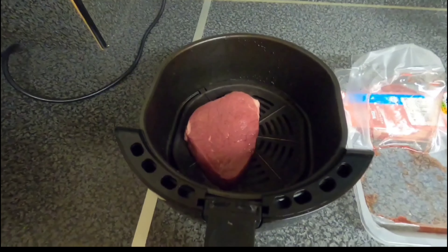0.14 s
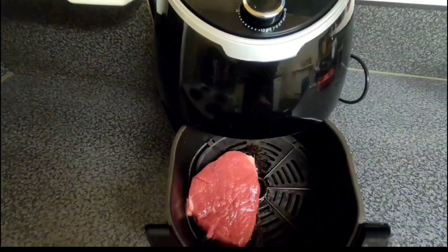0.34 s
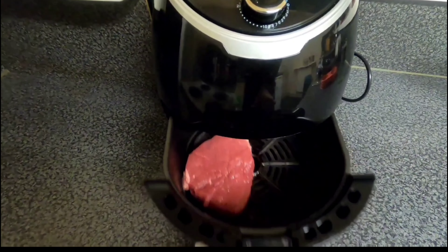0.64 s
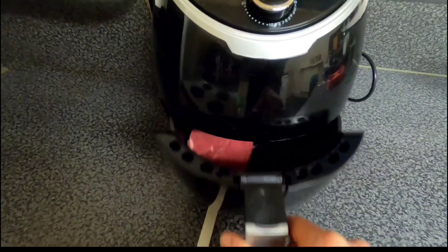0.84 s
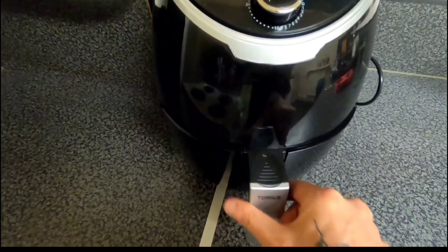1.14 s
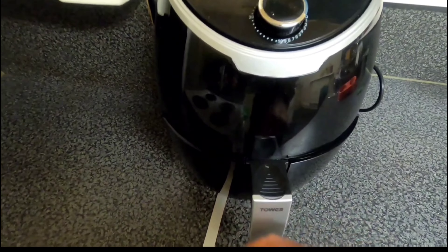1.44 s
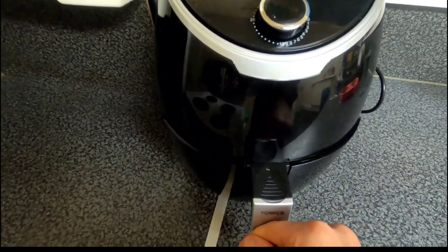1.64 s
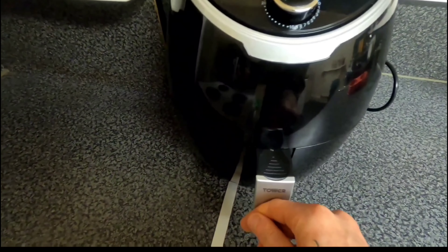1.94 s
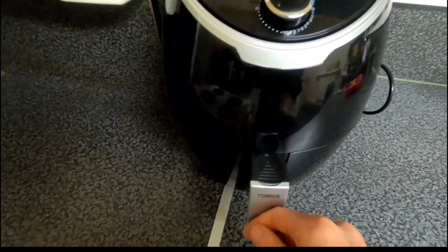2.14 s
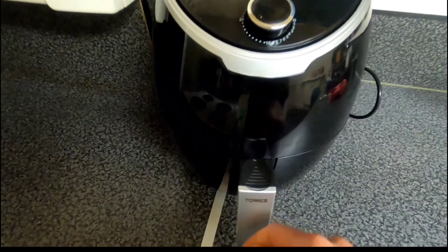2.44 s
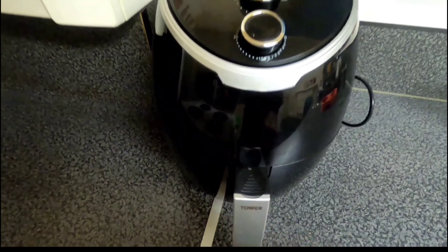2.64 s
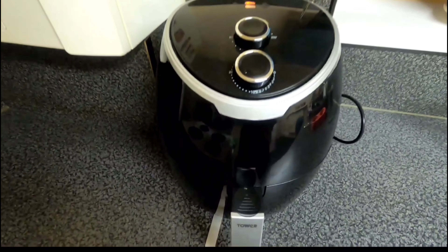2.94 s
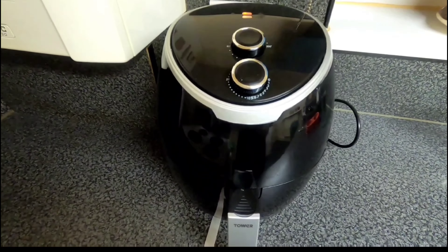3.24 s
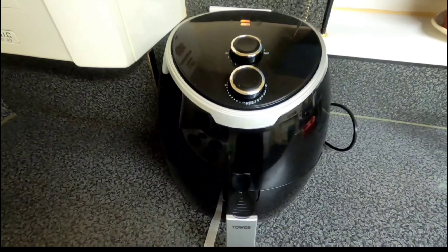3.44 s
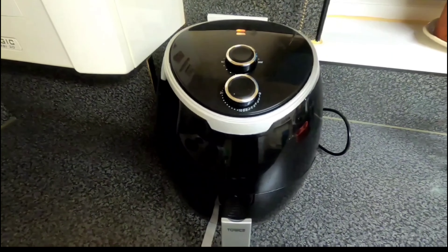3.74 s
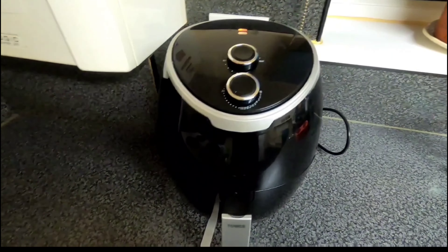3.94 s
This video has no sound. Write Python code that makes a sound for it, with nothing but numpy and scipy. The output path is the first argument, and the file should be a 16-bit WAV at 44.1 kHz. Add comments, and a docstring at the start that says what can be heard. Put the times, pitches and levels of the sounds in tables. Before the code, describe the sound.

An air fryer basket is pushed along its guides, scraping and knocking, with rattling plastic, a briefly ringing steel pan and dull thumps on the worktop. After a short lull the latch snaps shut, the loudest sound. The fan then spins up with a low hum and a growing rush of air, while a clockwork timer ticks faintly. The microphone is hand-held and close, in a hard-walled kitchen.

```python
"""Air fryer, latched and started

A hand-held microphone, close to the fryer in a hard-walled kitchen. The basket is lifted and rubs
along its guides; its knocks rattle the plastic shell and ring the steel pan, and its weight thumps
housing and worktop. It is pressed home until the latch snaps. The fan then spins up with a hum,
a duct drone and a rush of air, while the clockwork timer ticks."""
import sys
import numpy as np
from scipy import signal
from scipy.fft import rfft, irfft
from scipy.io import wavfile
from scipy.ndimage import uniform_filter1d, minimum_filter1d

SR = 44100
rng = np.random.default_rng(int(sys.argv[2]) if len(sys.argv) > 2 else 0)


def file_out(sig):
    """Save sig as 16-bit WAV at sys.argv[1]."""
    # one column per channel
    cols = np.atleast_2d(sig).T
    # limit, then scale
    lim = np.clip(cols, -1, 1)
    pcm = np.round(lim * 32767).astype(np.int16)
    wavfile.write(sys.argv[1], SR, pcm)


N = 180226
TIME = np.arange(N) / SR
RING_TIME = TIME[:SR]
SEATED_S, LATCH_S, FAN_START_S = 1.25, 2.0487, 2.453
DIP_START_S, DIP_END_S = 0.416, 0.488

# How alike the microphone's two sides are. Each row: frequency in Hz, correlation.
STEREO_LIKENESS = [(250, 0.94), (1300, 0.88), (2900, 0.75), (6000, 0.058)]
# Kitchen room tone. Each row: frequency in Hz, relative density in dB.
ROOM_SPECTRUM = [(20, 13), (60, 6), (140, 14), (215, 6.5), (330, -1.5), (700, -9), (1900, -14), (2500, -19),
                 (5000, -23.5), (9500, -31), (12000, -56.5)]
# Pushes along the guides. Each row: start in seconds, length in seconds, level in dB.
GUIDE_PUSHES = [(0.003, 0.066, -63.5), (0.48, 0.2, -74.5), (0.691, 0.0071, -55), (0.783, 0.5, -48)]
# Friction on the guides. Each row: frequency in Hz, relative density in dB.
RUB_SPECTRUM = [(150, -9), (600, 1.5), (850, -7), (1150, 0.5), (2000, -8), (4200, -13), (7000, -15.5),
                (11000, -25), (13500, -53)]
# The hollow basket's resonances. Each row: frequency in Hz, width in Hz, gain in dB.
HOLLOW_PEAKS = [(279, 83, 4), (564, 190, 0.5), (1050, 70, 1.5), (1600, 55, -5), (2130, 36, -15.5),
                (2820, 350, -12.5), (4200, 200, -15.5)]
# The hand jostles the basket. Each row: time in seconds, level in dB.
HAND_NUDGES = [(0.021, -35), (0.25, -36), (0.52, -39.5), (0.78, -33), (1.219, -35), (1.53, -44),
               (1.996, -41.5), (2.09, -44.5)]
# Handling rumble. Each row: frequency in Hz, relative density in dB.
JOSTLE_SPECTRUM = [(20, -10.5), (45, -5), (68, 9), (105, -7), (150, -2.5), (250, -13.5), (400, -25),
                   (900, -64.5)]
# Rubbing squeaks. Each row: time and half-length in seconds, pitch and width in Hz, level in dB.
RUB_SQUEAKS = [(0.06, 0.012, 4020, 630, -60), (0.698, 0.0072, 4450, 160, -59.5),
               (0.697, 0.0072, 1248, 406, -51), (1.055, 0.032, 4110, 234, -51),
               (1.062, 0.014, 1050, 150, -41), (1.086, 0.008, 602, 420, -28),
               (1.211, 0.0096, 2170, 118.7, -57)]
# Fingers on the handle. Each row: time in seconds, level in dB.
FINGER_SCUFFS = [(0.233, -58), (0.295, -53.5), (0.322, -65), (0.368, -58), (0.511, -50.5), (0.621, -56.5)]
# The handle is gripped or let go. Each row: start in seconds, level in dB, pitch in Hz, T60 in seconds.
FLEXES = [(1.351, -4.5, 237.5, 0.08), (1.519, -20.5, 216.6, 0.16), (1.822, -27, 238, 0.15)]
# The escapement unlocks, drops onto a tooth and rebounds.
# Each row: tick delay in seconds, tick level in dB, tock delay in seconds, tock level in dB.
BEAT_CONTACTS = [(-0.04, -17, -0.014, -10), (0, 0.5, 0, 0), (0.007, -2, 0.011, -7.5)]
# Resonances of the timer works. Each row: frequency in Hz, width in Hz, gain in dB.
WORKS_PEAKS = [(1380, 360, -5.5), (3030, 93, 1), (3890, 730, -8), (5270, 420, -0.5), (8620, 4600, -18)]
# The timer as the microphone moves over the dials. Each row: time in seconds, level in dB.
TIMER_AT_MIC = [(0.6, -43.5), (2.7, -48), (3.4, -45.5), (4.0, -39.5)]
# Hard edges snap past each other.
# Each row: start in seconds, ring level in dB, pitch in Hz, bright edge level in dB.
EDGE_SNAPS = [(0.623, -39.5, 655, -76.5), (0.7397, -23, 464, -60), (0.7925, -12, 778, -24),
              (0.876, -25, 1430, -44), (1.0704, -29, 1010, -42), (1.12, -18, 597, -37),
              (1.289, -15, 1750, -23), (1.338, -23, 3660, -23.5), (1.344, -19.5, 1240, -21.5),
              (2.039, -28.5, 1560, -43), (2.0445, -16.5, 980, -44.5)]
# The rim strikes the housing. Each row: start in seconds, shell level in dB, brightness in Hz,
# pan level in dB, loss per rebound in dB.
RIM_KNOCKS = [(0.7403, -37, 546, -28.5, 35.5), (0.794, -17, 2500, -19.5, 9.5),
              (0.82, -20.5, 700, -22.5, 12.5), (0.877, -23.5, 900, -42.5, 29), (1.083, -20, 650, -37.5, 4),
              (1.096, -23.5, 600, -43.5, 25), (1.121, -25.5, 685, -27.5, 10),
              (1.181, -35.5, 716, -56.5, 18), (1.291, -17, 876, -56, 25), (1.312, -15, 446, -32, 21.5),
              (1.337, -18, 1330, -23, 13.5), (2.0504, -17, 915, -15, 18), (2.112, -23, 860, -37, 7)]
# Plastic shell rattle. # Each row: frequency in Hz, relative density in dB.
SHELL_SPECTRUM = [(100, -4), (300, -19), (480, -2), (650, -1.5), (860, -7), (1100, -8.5), (1600, -11.5),
                  (2400, -15.5), (5000, -17.5), (8000, -25), (9700, -25.5), (11500, -64.5)]
# The steel pan's modes. Each row: frequency in Hz, level in dB, T60 in seconds.
STEEL_PAN_MODES = [(267.3, 0, 0.44), (476.5, -18.5, 1), (559, 4, 0.13), (587, 0.5, 0.033),
                   (491, -13, 0.073), (772, -24, 0.34), (944, -15.5, 0.14), (1023, -10.5, 0.4),
                   (1570, -9, 0.22), (1992, -18.5, 0.39), (2950, -18, 0.2), (3420, -16.5, 0.24),
                   (4000, -18, 0.15)]
# The basket's weight bumps the fryer.
# Each row: start in seconds, then housing thud, worktop boom and loss per rebound, all in dB.
BASKET_BUMPS = [(0.816, -41, -20.5, 32), (1.134, -25, -23.5, 4), (1.291, -11, -31.5, 27),
                (1.310, -10, -37, 17), (1.331, -12.5, -26.5, 14.5), (2.049, -6, -16.5, 30)]
# The worktop's modes. Each row: frequency in Hz, level in dB, T60 in seconds.
BOOM_MODES = [(49.3, -7, 0.46), (63.3, 3.5, 0.36)]
# The housing's modes. Each row: frequency in Hz, level in dB, T60 in seconds.
THUD_MODES = [(141, 2.5, 0.1), (176.7, -6.5, 0.19), (213.5, 1.5, 0.13), (267, -7.5, 0.3),
              (362.6, -11.5, 0.16)]
# Motor hum. Each row: frequency in Hz, level in dB.
HUM_PARTIALS = [(201, -59.5), (402, -69), (2005, -79)]
# The duct's resonances. Each row: frequency in Hz, width in Hz, gain in dB.
DUCT_PEAKS = [(140.6, 14, 0), (205, 15, 3), (222, 10, -1), (264.4, 8.5, -1), (392.5, 26, -11.5)]
# The duct's drone wavers as it builds. Each row: time in seconds, level in dB.
DUCT_LEVEL = [(2.4, -63.5), (2.75, -50.5), (2.81, -45), (2.88, -46.5), (3.0, -45.5), (3.1, -37),
              (3.22, -40.5), (3.52, -33.5), (3.68, -37), (4.08, -34.5)]
# Rushing air. # Each row: frequency in Hz, relative density in dB.
AIR_SPECTRUM = [(90, -1.5), (300, -2.5), (480, 2), (690, -6.5), (930, -4), (1080, -6.5), (1500, -6),
                (2040, -12), (3000, -15), (4000, -24.5), (6000, -31), (8500, -35.5), (11000, -74)]
# The grille's resonances. Each row: frequency in Hz, width in Hz, gain in dB.
GRILLE_PEAKS = [(792.4, 24, 5.5), (1176, 23, 4.5), (2820, 120, -10.5), (3730, 460, -23)]
# Reflections off the walls. Each row: frequency in Hz, relative density in dB.
WALL_SPECTRUM = [(60, -14.0), (300, -7.0), (2000, 2.5), (6000, 1.5), (13000, -2.0)]


def from_db(db):
    """Decibels to gain."""
    return 10 ** (np.asarray(db) / 20)


def rms_one(x):
    """Scale to unit power."""
    return x / np.sqrt(np.mean(x ** 2) + 1e-20)


def fader(levels):
    """A level curve as a gain at every sample."""
    return from_db(np.interp(TIME, *np.transpose(levels)))


def at_hz(points, hz):
    """Read a spectrum on a log-frequency axis."""
    f, value = np.transpose(points)
    return np.interp(np.log(hz + 1), np.log(f), value)


def decay(t60):
    """An envelope that loses 60 dB in t60 seconds."""
    return np.exp(-np.log(1000) * RING_TIME / t60)


def swell(s, hold_s, db, rise_db_per_s, fall_db_per_s):
    """A gain that climbs to db at time s, holds and falls away."""
    early, late = np.maximum(s - TIME, 0), np.maximum(TIME - s - hold_s, 0)
    return from_db(np.maximum(db - rise_db_per_s * early - fall_db_per_s * late, -200))


def add(out, s, sound):
    """Mix a sound in at time s."""
    i = max(round(s * SR), 0)
    out[..., i:i + sound.shape[-1]] += sound[..., :N - i]


def cut(x, hz, kind, order=2):
    """Butterworth filter."""
    sections = signal.butter(order, np.clip(hz, 10, .45 * SR), kind, fs=SR, output="sos")
    return signal.sosfilt(sections, x + 1e-18)


def wander(hz, shape):
    """Random motion, mostly slower than hz; rms 1."""
    return rms_one(cut(rng.standard_normal(shape), hz, "low"))


def noise(spectrum=None, size=N):
    """Stereo noise of a given colour, alike on both sides in the bass; rms 1."""
    hz = np.arange(size // 2 + 1) * SR / size
    alike = np.clip(at_hz(STEREO_LIKENESS, hz), -1, 1)
    mid, side = rfft(rng.standard_normal((2, size)))
    both = np.sqrt(1 + alike) * mid + np.sqrt(1 - alike) * side * [[1], [-1]]
    colour = from_db(at_hz(spectrum, hz)) if spectrum else 1
    return rms_one(irfft(both * colour, size))


def resonate(x, peaks):
    """Parallel resonances of alternating sign; rms 1."""
    return rms_one(sum((-1) ** k * from_db(db) * signal.lfilter(*signal.iirpeak(hz, hz / width, SR), x)
                       for k, (hz, width, db) in enumerate(peaks)))


def ring(modes, spread_db, detune):
    """One blow on a body: the place of contact changes each mode's strength and pitch a little."""
    out = 0
    for hz, db, t60 in modes:
        gain = from_db(db + spread_db * rng.normal())
        pitch = hz * (1 + detune * rng.normal())
        out += gain * decay(t60) * np.sin(2 * np.pi * pitch * RING_TIME)
    return out


def rebounds(s, loss_db, count=4, spacing_s=0.021):
    """Times and gains of a blow's contacts, each weaker than the last."""
    return [(s + k * spacing_s, from_db(-k * loss_db)) for k in range(count)]


def kitchen(x, wet_db, t60=0.4):
    """Dense reflections off hard walls build up within a few milliseconds and die evenly."""
    walls = noise(WALL_SPECTRUM, size=SR) * decay(t60) * (1 - decay(0.0029))
    walls /= np.sqrt(np.sum(walls ** 2) / 2)
    return x + from_db(wet_db) * signal.fftconvolve(x, walls, axes=1)[:, :N]


def room_tone():
    """The quiet kitchen, with a faint whine at first."""
    whine = from_db(-66.5) * np.sin(2 * np.pi * 1340 * TIME) * (TIME < DIP_START_S)
    return from_db(-56.5) * noise(ROOM_SPECTRUM) + whine


def sliding(grain_db=6.0, grain_hz=305, hollow_db=3.5):
    """Friction on the guides comes in uneven grains and sounds the hollow basket."""
    grains = rms_one(from_db(grain_db * wander(grain_hz, N)))
    friction = grains * noise(RUB_SPECTRUM)
    hollow = resonate(grains * noise(), HOLLOW_PEAKS)
    pushes = [swell(*push, rise_db_per_s=476.5, fall_db_per_s=193) for push in GUIDE_PUSHES]
    # the catch scrapes up its ramp, harder and harder, until it drops in
    ramp = swell(LATCH_S, 0, db=-26, rise_db_per_s=892.5, fall_db_per_s=2493)
    return (np.max(pushes, axis=0) + ramp) * (friction + from_db(hollow_db) * hollow)


def jostling():
    """Each nudge of the hand is a low rumble that swells quickly and dies slowly."""
    nudges = sum(swell(s, 0.0033, db, rise_db_per_s=301.5, fall_db_per_s=95) for s, db in HAND_NUDGES)
    return nudges * noise(JOSTLE_SPECTRUM)


def squeaks():
    """A catching edge sings in an unsteady band that swells and fades."""
    out = 0
    for s, half_length, hz, width, db in RUB_SQUEAKS:
        phase = 2 * np.pi * hz * TIME
        flutter = wander(width / 2, (2, N))
        envelope = from_db(db) * np.exp(-.5 * ((TIME - s) / half_length) ** 2)
        out += envelope * (flutter[0] * np.cos(phase) + flutter[1] * np.sin(phase))
    return out


def handle(scuff_band_hz=(1015, 1345), wobble=0.1):
    """Fingers scuff the hollow grip; the handle flexes with a short, dull, unsteady note."""
    grip = rms_one(cut(noise(), scuff_band_hz, "band"))
    out = grip * sum(swell(s, 0, db, rise_db_per_s=2996, fall_db_per_s=705.5) for s, db in FINGER_SCUFFS)
    for s, db, hz, t60 in FLEXES:
        pitch = hz * (1 + wobble * wander(hz / 2, SR))
        envelope = from_db(db) * decay(t60) * (1 - decay(0.089))
        add(out, s, envelope * np.sin(2 * np.pi * np.cumsum(pitch) / SR))
    return out


def timer(first_tick_s=0.6008, period_s=0.5246, tock_after_s=0.2576):
    """The balance swings, tick and tock; each escapement contact is a tiny chatter in the works."""
    contacts = np.zeros((2, N))
    chatter = decay(0.031) * (1 - decay(0.00085))
    for s in np.arange(first_tick_s, TIME[-1], period_s):
        for tick_delay, tick_db, tock_delay, tock_db in BEAT_CONTACTS:
            add(contacts, s + tick_delay, from_db(tick_db) * chatter)
            add(contacts, s + tock_after_s + tock_delay, from_db(tock_db) * chatter)
    works = cut(resonate(noise(), WORKS_PEAKS), 1000, "high", order=1)
    works = cut(works, 11500, "low", order=4)
    return fader(TIMER_AT_MIC) * contacts * works * from_db([[-1.5], [1.5]])


def snap(db, hz, cycles, edge_db, crack_db, top_hz, edge_t60, rise_s):
    """Stiff plastic cracks in one sharp pulse, then rings briefly under a bright edge of noise."""
    tone = decay(cycles / hz) * (1 - decay(2 / hz)) * np.sin(2 * np.pi * hz * RING_TIME)
    edge = rms_one(cut(noise(size=SR), [1800, top_hz], "band", order=3))
    edge *= decay(edge_t60) * (1 - decay(rise_s))
    crack = cut(1. * (RING_TIME == 0), [1700, 5540], "band")
    return from_db(db) * tone + from_db(edge_db) * edge + from_db(crack_db) * crack / np.abs(crack).max()


def snaps():
    """Edges snap on the way in; last, loudest and sharpest, the latch drops home."""
    out = np.zeros((2, N))
    for s, db, hz, edge_db in EDGE_SNAPS:
        add(out, s, snap(db, hz, cycles=22, edge_db=edge_db, crack_db=edge_db + 2.5,
                         top_hz=5370, edge_t60=0.018, rise_s=0.0087))
    add(out, LATCH_S, snap(db=12, hz=1460, cycles=7.25, edge_db=-6.5, crack_db=-1.5,
                           top_hz=6600, edge_t60=0.02, rise_s=0.002))
    return out


def knocks():
    """The basket's rim chatters on the housing, rattling the plastic shell and ringing the steel pan."""
    clatter, pan_ring = np.zeros((2, 2, N))
    for s, shell_db, bright_hz, pan_db, loss_db in RIM_KNOCKS:
        for at, gain in rebounds(s, loss_db):
            shell = rms_one(cut(noise(SHELL_SPECTRUM, size=SR), bright_hz, "low", order=1))
            shell *= decay(0.075) * (1 - decay(0.0022))
            pan = cut(ring(STEEL_PAN_MODES, spread_db=2.5, detune=0.0075), bright_hz, "low")
            if s > SEATED_S:
                pan *= decay(0.31)   # the housing damps the seated pan
            add(clatter, at, gain * from_db(shell_db) * shell)
            add(pan_ring, at, gain * from_db(pan_db) * pan)
    return clatter, pan_ring


def bumps(bright_hz=800):
    """The basket's weight rocks the whole fryer: the worktop booms and the housing thuds."""
    out = np.zeros((2, N))
    for s, thud_db, boom_db, loss_db in BASKET_BUMPS:
        worktop = ring(BOOM_MODES, spread_db=3.5, detune=0.1) * (1 - decay(0.014))
        add(out, s, from_db(boom_db) * worktop)
        for at, gain in rebounds(s, loss_db):
            housing = ring(THUD_MODES, spread_db=2.5, detune=0.023) * (1 - decay(0.028))
            add(out, at, gain * from_db(thud_db) * cut(housing, bright_hz, "low"))
    return out


def fan(spin_up_s=1.008, air_db_per_doubling=19):
    """Latching starts the motor: it hums, the duct drones, and the air rush grows steeply with speed."""
    speed = np.tanh(np.maximum(TIME - FAN_START_S, 0) / spin_up_s)
    air_gain = from_db(air_db_per_doubling * np.log2(speed + 1e-6))
    duct = fader(DUCT_LEVEL) * rms_one(cut(resonate(noise(), DUCT_PEAKS), 98, "high"))
    hum = sum(from_db(db) * np.sin(2 * np.pi * hz * TIME) for hz, db in HUM_PARTIALS)
    air = from_db(-38.5) * noise(AIR_SPECTRUM)
    grille = from_db(-47) * resonate(noise(), GRILLE_PEAKS)
    return ((TIME > LATCH_S) * (duct + hum) + air_gain * (air + grille)) * from_db([[-0.3], [0.3]])


def scene():
    """The fryer and the hand on its basket from close by, with the kitchen behind them."""
    clatter, pan_ring = knocks()
    thumps = pan_ring + bumps()
    fryer = kitchen(clatter, wet_db=0.5)
    fryer += kitchen(thumps + handle(), wet_db=-1.5)
    fryer += kitchen(snaps(), wet_db=-11.0)
    fryer += kitchen(sliding() + squeaks(), wet_db=2.5)
    fryer += kitchen(timer(), wet_db=-7.0)
    left, right = fryer + jostling() + fan() + room_tone()
    # the fryer stands a little to the right, so the microphone's left side hears it one sample later
    return np.array([np.append(0, left[:-1]), right])


def limiter(x, ceiling_db, release_db_per_s):
    """The gain ducks just ahead of a peak and creeps back."""
    over = np.maximum(20 * np.log10(np.abs(x).max(axis=0) + 1e-9) - ceiling_db, 0)
    held = np.maximum.accumulate(over + release_db_per_s * TIME) - release_db_per_s * TIME
    return x * from_db(uniform_filter1d(minimum_filter1d(-held, size=89), size=89))


def record(dry, dip_db=-26, stopband_hz=14800):
    """After the microphone: a low cut, a peak limiter, a brief dip in level and a steep top cut."""
    limited = limiter(cut(dry, 28, "high"), ceiling_db=-3.0, release_db_per_s=67.5)
    live = uniform_filter1d(1. * ((TIME < DIP_START_S) | (TIME > DIP_END_S)), size=64)
    top_cut = signal.cheby2(14, 70, stopband_hz, fs=SR, output="sos")
    return signal.sosfilt(top_cut, limited * np.maximum(live, from_db(dip_db)))


dry = scene()
out = record(dry)
file_out(out)
```